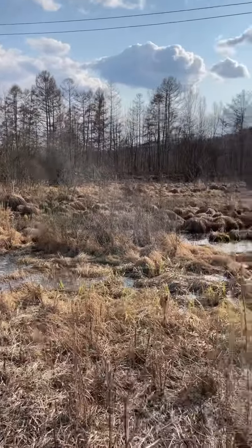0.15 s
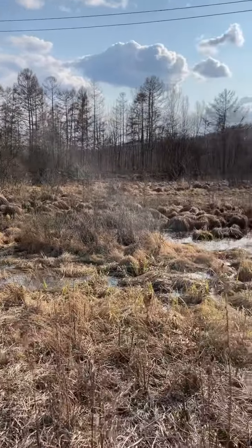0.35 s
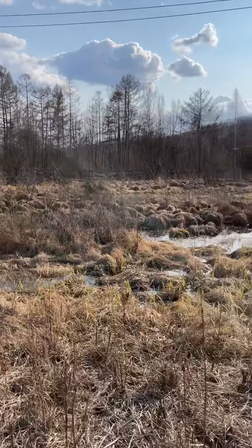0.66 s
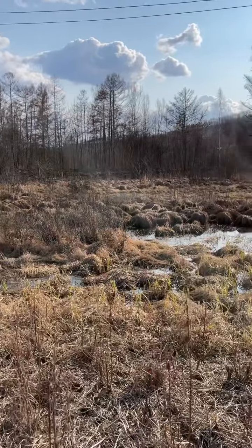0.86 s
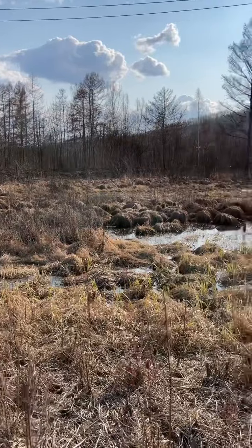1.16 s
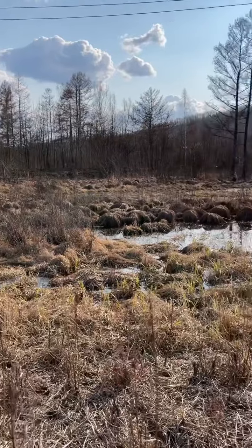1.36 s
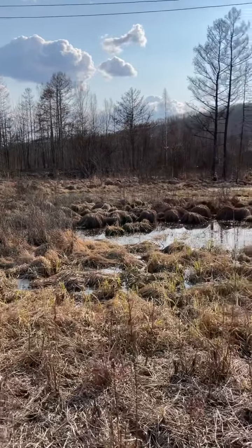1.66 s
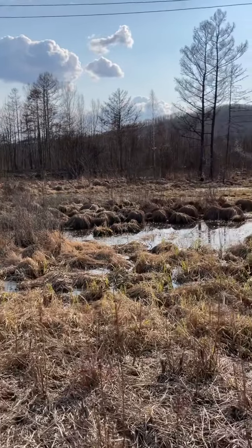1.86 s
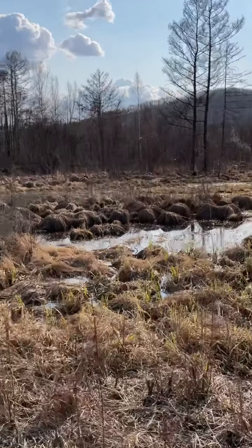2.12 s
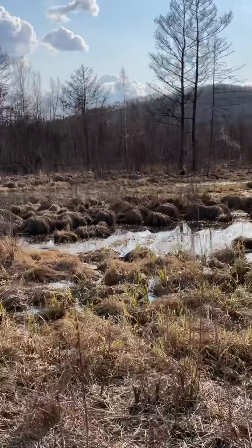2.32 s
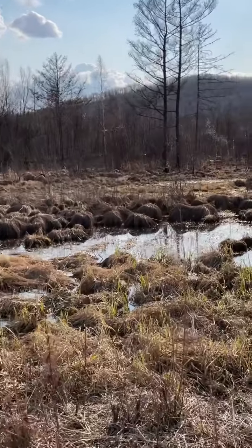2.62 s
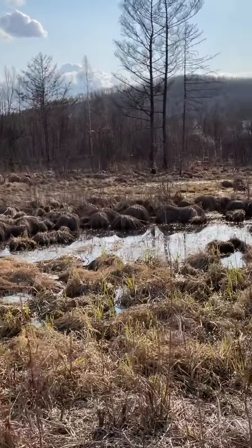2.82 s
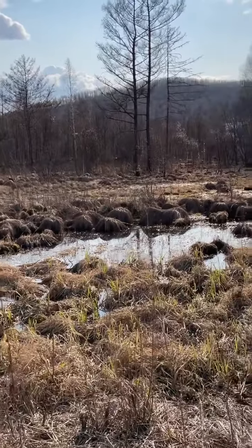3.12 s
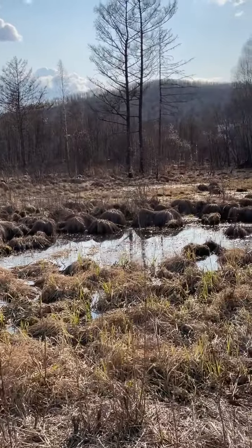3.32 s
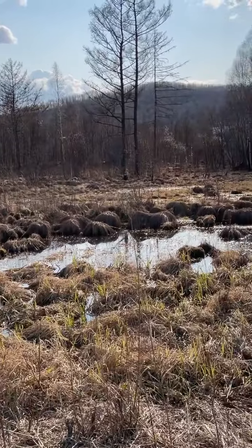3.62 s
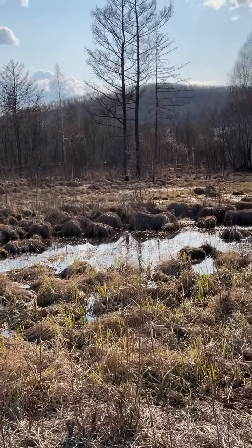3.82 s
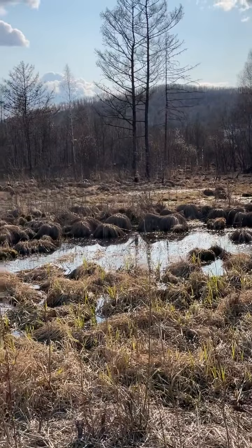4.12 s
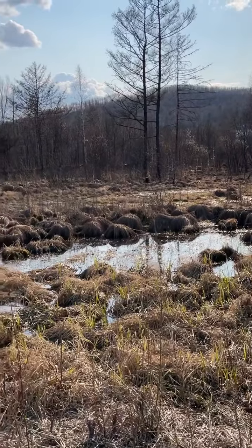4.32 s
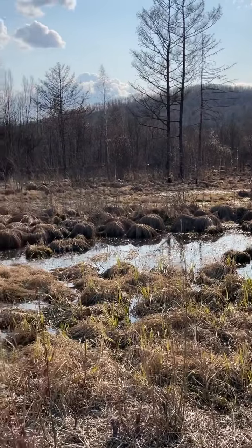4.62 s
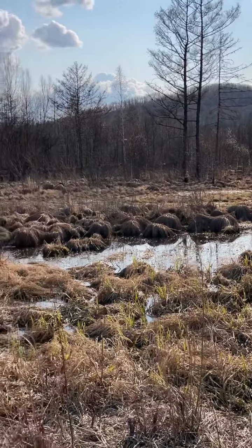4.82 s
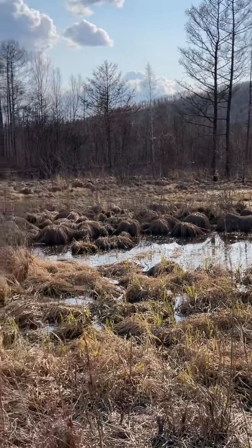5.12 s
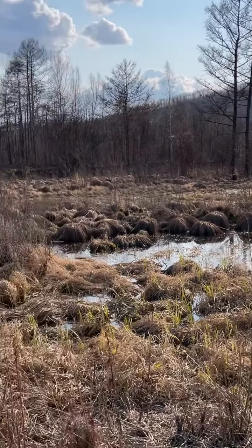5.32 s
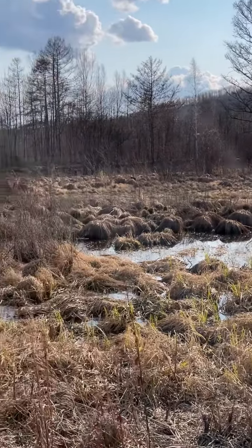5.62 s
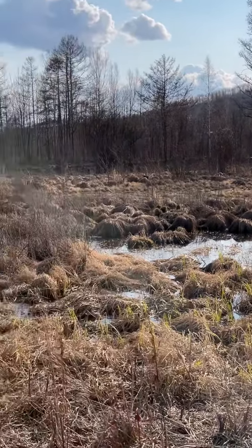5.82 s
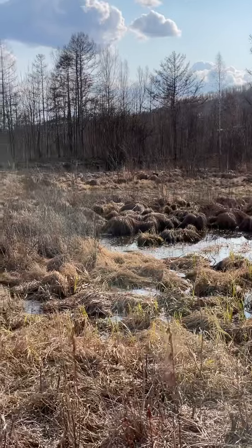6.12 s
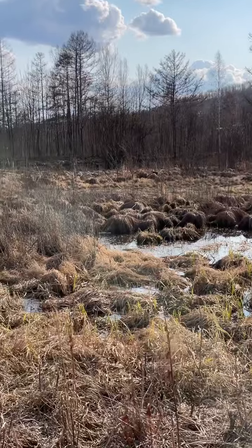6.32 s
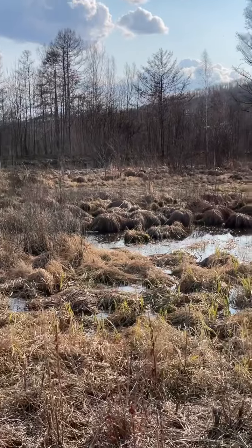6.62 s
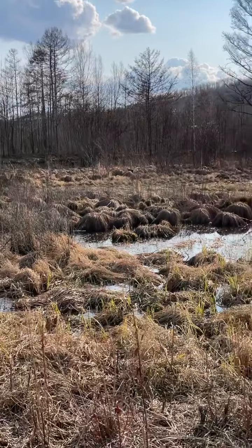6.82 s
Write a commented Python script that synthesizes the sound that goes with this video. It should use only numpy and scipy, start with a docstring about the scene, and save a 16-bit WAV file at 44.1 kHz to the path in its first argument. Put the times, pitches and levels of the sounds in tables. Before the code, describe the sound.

A dense chorus of frogs trills in short, rising notes over a marsh pool, while low wind bumps and slaps grow stronger later on.

```python
"""A marsh pool full of frogs, each trilling short, clear, arched notes; most calls climb in pitch.
From the start near calls stand out of a farther crowd over a swelling hiss, like a blur of far frogs,
with a thin rustle, sharp ticks, and wind that bumps and slaps.
From about 2 s the chorus drifts from the left toward the centre; most of the wind slaps come after 3.6 s.
Frogs are sums of gliding sine partials; hiss, rustle, ticks and wind are shaped noise, slaps falling tones."""
import sys
import numpy as np
from scipy import signal
from scipy.fft import rfft, irfft, next_fast_len
from scipy.io import wavfile
from scipy.ndimage import uniform_filter1d, map_coordinates

SR = 44100
rng = np.random.default_rng(int(sys.argv[2]) if len(sys.argv) > 2 else 0)


def dump(signal):
    """Clip the signal to [-1, 1] and save it as 16-bit WAV at the path in sys.argv[1]."""
    limited = np.clip(np.atleast_2d(signal).T, -1, 1)
    pcm = np.round(limited * 32767).astype(np.int16)
    wavfile.write(sys.argv[1], SR, pcm)


N = 306936

# how the crowd and the hiss come and go:
# (time [s], far frogs' level [dB], hiss level [dB], lift of the far frogs' overtones [dB])
CROWD_LEVELS = [(0.0, -32, -42.5, -5.5), (.18, -39, -48, -4), (0.31, -33, -41, 0),
                (0.66, -29.5, -49.5, 4.5), (1.3, -33.5, -45.5, 1.5), (1.76, -30.5, -39.5, 1.5),
                (2.38, -31, -41, -5), (2.55, -42, -53, 6), (2.87, -37, -44, -7), (3.4, -34, -43.5, 4.5),
                (3.7, -42, -48.5, -6), (3.97, -31.5, -43.5, -3), (4.48, -34.5, -47.5, -4.5),
                (5.31, -36, -52, -4.5), (5.5, -29, -41, 2), (5.8, -29.5, -47.5, 3),
                (5.95, -42.5, -53.5, -8.5), (6.16, -39.5, -51, -0.5), (6.32, -38.5, -49.5, -0.5),
                (6.7, -38.5, -44.5, 1), (6.96, -35.5, -38.5, -2.5)]


def amp(db):
    """Decibels to an amplitude factor."""
    return 10 ** (np.asarray(db) / 20)


def unit(x):
    """Scale to an rms of 1."""
    return x / np.sqrt(np.mean(x ** 2) + 1e-20)


def along(points, hz):
    """Read (frequency [Hz], value) points on a logarithmic frequency axis."""
    f, v = np.transpose(points)
    return np.interp(np.log(hz + 1), np.log(f + 1), v)


def curves(rows):
    """Join the points of each column after the time: one value per sample."""
    s, *cols = np.transpose(rows)
    return [np.interp(np.arange(N) / SR, s, c) for c in cols]


def wobble(rate):
    """A smooth random curve with rate knots a second."""
    knots = rng.standard_normal(int(N * rate / SR) + 4)
    return map_coordinates(knots, [np.arange(N) * rate / SR])


def filtered(x, response):
    """Multiply the spectrum of x by a response that depends on frequency."""
    m = next_fast_len(N + SR // 2)
    hz = np.fft.rfftfreq(m, 1 / SR)
    return irfft(rfft(x, m) * response(hz), m)[..., :N]


def noise(spectrum, channels=1):
    """Random noise coloured by a spectrum, rms 1."""
    white = rng.standard_normal((channels, N))
    return unit(filtered(white, lambda hz: amp(along(spectrum, hz))))


def frogs():
    """Near notes over the far crowd; distance over the reeds dulls the top."""
    crowd = amp(curves(CROWD_LEVELS)[0]) * unit(trills(count=66))
    voices = notes(skirt=1.2) + warbles() + crowd
    voices = filtered(voices, lambda hz: 1 / np.sqrt(1 + (hz / 4250) ** 12)) + rings()
    tail = marsh(voices, t60=0.2)
    return voices + amp(-14) * tail


def notes(skirt):
    """The pitch glides and sags at both ends; the strong octave swells briefly, other partials last longer."""
    vary_length, vary_glide, vary_pitch, vary_db = .2, 0.04904, 0.0093, 1.5  # note-to-note scatter
    glide, skew = -0.01954, .4  # shared slope as a share of pitch; deeper sags fall further at the end
    rise, fall = .8, 1.2  # a note starts faster than it dies away
    half = SR // 20
    out, t = np.zeros((2, N + SR)), np.arange(-half, half) / SR
    for s, length, sag, hz, db, bright_db in sung():
        longer, steeper, higher, louder = np.tanh(rng.standard_normal(4))
        # u is 0 at the middle of the note and reaches the skirt where it falls silent
        this_length = length * (1 + vary_length * longer)
        u = np.clip(t / np.where(t < 0, rise, fall) / this_length, -skirt, skirt)
        arch_db = 20 * np.log10(np.abs(np.cos(np.pi / 2 * u / skirt)) + 1e-6)
        fade_db = arch_db * np.array([[3], [5], [1.6]])
        swell_db = db + vary_db * louder + np.array([[-4.5], [0], [bright_db]]) + fade_db
        slope = glide - skew * sag + vary_glide * steeper
        pitch = hz * (1 + vary_pitch * higher) * (1 + slope * u - sag * u ** 2)
        add(out, s, pitch, swell_db, rough=.005, unsteady=0.7)
    return out[:, half:half + N]


def sung():
    """List every near note: in a call, pitch and strength move evenly from first to last note."""
    # near calls, each a train of notes: (first note [s], last note [s], notes [count],
    # middle note early by [s], note length scale [s], sag at both ends [share of pitch],
    # first pitch [Hz], last pitch [Hz], first level [dB], last level [dB], overtone lift [dB])
    near_calls = [(0.018, 0.291, 5, -0.00073, .03, 0.13, 611, 689.7, -26, -39.5, 6),
                  (0.41, 0.654, 5, 0.009, 0.037, 0.098, 586.5, 667, -25.5, -19.5, 1),
                  (0.493, 0.666, 4, 0.003, .035, 0.099, 679.5, 689.6, -24.5, -21.5, -5),
                  (0.497, 0.817, 6, -0.00063, 0.042, .16, 743, 768, -28, -24, -8.5),
                  (0.918, 1.112, 4, 0.0047, .026, .16, 814, 824, -46, -38, -6),
                  (0.986, 1.207, 5, 0.013, .028, 0.18, 634.6, 752, -24.5, -21, 0.5),
                  (1.478, 1.769, 6, 0.0065, 0.026, .14, 633.6, 668, -27.5, -19, -33),
                  (1.556, 1.796, 5, 0.011, 0.024, 0.16, 688, 780, -38, -15, -6),
                  (1.938, 2.098, 3, -0.0019, .028, 0.13, 719, 752, -31.5, -25, -3),
                  (1.971, 2.115, 3, 0.0095, 0.026, .12, 629, 633, -22.5, -19.5, -10.5),
                  (2.151, 2.311, 4, -0.0076, 0.037, .16, 635, 681, -29.5, -19.5, -6),
                  (2.397, 2.499, 3, 0.0083, 0.032, 0.14, 632, 686, -31, -26, -1.5),
                  (2.916, 3.044, 3, 0.023, 0.023, .14, 719, 756, -33, -46.5, 3),
                  (3.06, 3.524, 9, 0.0098, 0.032, .12, 578.8, 681.5, -27, -34, -15),
                  (3.697, 4.126, 8, 0.0052, 0.03316, 0.144, 603, 725, -29.5, -22.5, -4),
                  (4.319, 5.023, 11, 0.014, 0.028, 0.35, 673, 855.6, -28.5, -21, -5),
                  (4.502, 4.973, 8, 0, 0.029, 0.21, 562, 554, -32.5, -43.5, 4.5),
                  (4.729, 5.129, 6, -0.0069, .033, .1, 641, 637.6, -48, -25, -12.5),
                  (5.177, 5.908, 14, 0.0094, .03, .12, 600.4, 741.4, -32, -16, -3),
                  (5.584, 5.934, 7, -0.012, .027, .16, 642, 657.4, -21.5, -19.5, -1),
                  (6.293, 6.89, 12, 0.0039, 0.039, 0.086, 636.6, 750.8, -25.5, -25.5, -2),
                  (6.831, 6.964, 3, 0.00046, 0.043, 0.059, 665, 659, -23.5, -21, -5)]
    # single notes outside the regular trains, faint to loud:
    # (middle [s], pitch [Hz], level [dB], overtone lift [dB])
    single_notes = [(0.065, 731, -30, 4), (0.159, 640, -28, -12), (0.23, 675, -24, -11),
                    (0.544, 800, -25, 0), (0.77, 665, -27, -7), (0.894, 675, -26.5, 3),
                    (0.932, 648, -23, -1), (1.052, 665, -23, -9), (1.322, 604, -32, 8),
                    (1.379, 640, -20.5, -2), (1.845, 599, -31.5, -8.5), (2.09, 595, -28, -12.5),
                    (2.448, 645, -32.5, 8), (2.682, 790, -43, -5), (2.77, 711, -30.5, 0),
                    (2.796, 660, -29, -13), (2.876, 636, -30, -3), (3.305, 650, -28.5, 3),
                    (3.44, 761, -33.5, 1), (3.49, 791, -32.5, 6), (3.8, 639, -32, 3), (4.1, 653, -25, 1.5),
                    (4.157, 647, -23, -29), (4.244, 801, -39.5, 13), (4.287, 651, -27, -16.5),
                    (4.437, 614, -24.5, -9), (5.054, 650, -26.5, 0), (5.289, 620, -25.5, -6.5),
                    (5.389, 660, -25, 6), (5.499, 620, -28, 2.5), (5.558, 619, -19.5, -2),
                    (5.666, 665, -22.5, -6), (6.081, 550, -34, -7), (6.151, 840, -30, -5),
                    (6.157, 625, -26, -15), (6.186, 794, -20, 0), (6.215, 638, -25.5, 0),
                    (6.254, 635, -24.5, -12), (6.317, 640, -21.5, -2), (6.401, 654, -17, -7),
                    (6.424, 661, -23, -15), (6.461, 692, -16.5, -3), (6.731, 732, -24.5, -5)]
    single_length, single_sag = 0.02605, .14  # length scale [s], sag [share of pitch]
    rows = [(s, single_length, single_sag, *rest) for s, *rest in single_notes]
    for first, last, count, early, length, sag, hz0, hz1, db0, db1, bright_db in near_calls:
        for u in np.linspace(0, 1, round(count)):
            s = first + (last - first) * u - 4 * early * u * (1 - u)
            hz = hz0 + (hz1 - hz0) * u
            db = db0 + (db1 - db0) * u
            rows.append((s, length, sag, hz, db, bright_db))
    return rows


def add(out, s, pitch, swell_db, rough, unsteady=0.94, early=0, dull_db=0, mouth_hz=3000, mouth_db=0):
    """Add one frog from time s: flickering partials on a shaky pitch, set between the microphones."""
    # partials of the voice, scatter and flicker before the caller's unsteadiness: (multiple of the pitch,
    # level [dB], scatter [dB], flicker [dB], scatter of the left side's lead [rad])
    partials = [(1, -12, 7, 5.5, 1), (2, -1.5, -2, 1.5, 0.17), (3, -25, 3.5, 7.5, 0.11),
                (4, -34.5, 8, 10, .4), (5, -34.5, 5, 11, 0.49), (6, -35, 5.5, 13.5, 0.49),
                (7, -42, 3, 11.5, 0.57), (8, -49, -2, 7.5, .5)]
    # extra level of the fundamentals: (time [s], level [dB])
    low_levels = [(0, -1), (1, -3), (2, -5), (3, -1), (4.2, 3.5), (5, 4), (5.7, 2.5), (6.96, -4.5)]
    mouth_width_hz = 410
    order, level_db, scatter_db, flicker_db, lead_scatter = np.transpose(partials)[..., None]
    count = len(partials)
    group = np.minimum(np.arange(count), 2)  # fundamental, octave, overtones
    t = np.arange(len(pitch)) / SR
    knots = np.arange(int(t[-1] * 300) + 2) / 300
    shake = np.interp(t, knots, rng.standard_normal(len(knots)))
    turns = np.cumsum(pitch * (1 + rough * shake)) / SR
    # per partial: level, lead and starting phase, then the flicker at 75 knots a second
    draw = np.tanh(rng.standard_normal((count, 3 + len(knots[::4]) + 1)))
    flicker = np.array([np.interp(t, np.arange(len(d)) / 75, d) for d in draw[:, 3:]])
    start, heard_s = max(round(s * SR), 0), s - early
    gain_db = swell_db[group] + level_db - dull_db * np.maximum(order - 3, 0)
    gain_db = gain_db + unsteady * (scatter_db * draw[:, :1] + flicker_db * flicker)
    gain_db = gain_db + mouth_db * np.exp(-((order * pitch - mouth_hz) / mouth_width_hz) ** 2)
    gain_db = gain_db + (order == 1) * np.interp(heard_s, *np.transpose(low_levels))
    tilt_db, lead = place(heard_s)[group].T[..., None]
    # a random phase shake roughens the overtones
    phase_shake = np.array([np.interp(t, knots, k) for k in rng.standard_normal((count, len(knots)))])
    phase = 2 * np.pi * (order * turns + draw[:, 2:3]) + unsteady * .35 * (order > 2) * phase_shake
    for side, half in enumerate((.5, -.5)):
        wave = np.sin(phase + half * (lead + lead_scatter * draw[:, 1:2]))
        out[side, start:start + len(t)] += np.sum(amp(gain_db + half * tilt_db) * wave, 0)


def place(s):
    """Left-right level and phase differences of fundamental, octave and overtones at time s."""
    # where the chorus sits: (time [s], position [0 left to 1 near the centre])
    drift_points = [(0, 0.25), (.7, 0.0063), (2.2, 0), (2.8, 0.47), (3.9, 0.65), (4.6, 1), (6.96, 0.93)]
    # both ends of the drift, rows fundamental, octave, overtones: (left minus right [dB], left lead [rad])
    at_left = [(11, 0.5), (7.3, 0.69), (1.4, 0.97)]
    at_centre = [(1.8, 2.32), (4.34, 0.34), (.3, 0.54)]
    drift = np.interp(s, *np.transpose(drift_points))
    return (1 - drift) * np.array(at_left) + drift * np.array(at_centre)


def warbles():
    """Calls whose notes run together into one wavering line, higher and louder at every throb."""
    # unbroken calls: (start [s], end [s], throbs [per s], first throb after [s], first pitch [Hz],
    # last pitch [Hz], waver [share of pitch], fundamental [dB], octave [dB], overtones [dB],
    # loss per partial above the third [dB], mouth resonance [Hz], its lift [dB])
    wavering_calls = [(2.532, 2.673, 16.5, .002, 708, 657, 0.025, -25, -23, -25.5, 0.5, 3080, 16.5),
                      (5.084, 5.375, 18, 0.017, 670, 930, 0.12, -31, -43, -26.5, 10.5, 3100, 21.5),
                      (5.982, 6.148, 18, .026, 515, 644, 0.081, -49, -64, -11.5, 19, 1900, -2.5),
                      (3.185, 3.33, 16, 0.017, 595, 560, 0.02, -31, -27, -38, 0, 3000, 5),
                      (6.64, 6.765, 17, 0.031, 700, 735, 0.0088, -28.5, -20.5, -31, -2, 4200, 8.5),
                      (6.24, 6.33, 17.6, .03, 580, 635, 0.014, -35, -27.5, -29, 2, 2500, 6)]
    # swing of the throb either way, for fundamental, octave, overtones: (level [dB])
    throb_db = [
        [2.5],
        [2.5],
        [1.5],
    ]
    edge_s = .012
    out = np.zeros((2, N + SR))
    for start, end, rate, first, hz0, hz1, waver, *levels_db, dull_db, mouth_hz, mouth_db in wavering_calls:
        t = np.arange(round((end - start) * SR)) / SR
        throb = np.cos(2 * np.pi * rate * (t - first))
        ends_db = 20 * np.log10(np.minimum(1, np.minimum(t, t[::-1]) / edge_s) + 1e-6)
        swell_db = np.array(levels_db)[:, None] + np.array(throb_db) * (throb - 1) + ends_db
        pitch = np.linspace(hz0, hz1, len(t)) * (1 + waver * throb)
        add(out, start, pitch, swell_db, rough=0.0013, unsteady=0.4,
            dull_db=dull_db, mouth_hz=mouth_hz, mouth_db=mouth_db)
    return out[:, :N]


def rings():
    """Single overtones that ring out: a slightly shaky arched tone under a smooth swell."""
    # (middle [s], length scale [s], first pitch [Hz], last pitch [Hz], arch height [Hz], level [dB])
    ringing_tones = [(2.454, 0.073, 3990, 3750, 64, -49), (2.505, 0.043, 3450, 3310, 26, -52),
                     (2.529, 0.018, 3750, 3700, 24, -46.5), (3.269, 0.035, 2950, 2730, 62, -48),
                     (3.415, 0.057, 4660, 3970, 56, -51.5), (3.48, 0.033, 4070, 3840, 101, -48.5),
                     (3.521, 0.047, 3430, 3370, 88.5, -53.5), (4.07, 0.055, 3670, 3760, 66, -49),
                     (4.314, 0.035, 4000, 3880, 192, -53.5), (4.513, .03, 3670, 3770, 62, -54),
                     (4.587, 0.026, 3500, 3520, 78, -46), (4.708, 0.019, 3900, 3970, 52, -51.5),
                     (4.74, 0.024, 5700, 5530, 67, -66), (4.788, .04, 3330, 3250, 56, -54),
                     (4.825, 0.023, 3400, 3710, 54, -51), (4.794, 0.05, 2250, 1960, 298, -46.5),
                     (4.882, .05, 2350, 1940, 298, -50), (4.957, 0.046, 2310, 1920, 300, -46.5),
                     (5.017, .045, 2300, 2130, 280, -46), (4.878, 0.028, 4930, 4540, 152, -55),
                     (4.958, 0.036, 4700, 4480, 251, -63), (5.675, 0.038, 2600, 2210, 278.5, -33.5),
                     (5.136, 0.06, 3190, 3090, -75, -60), (5.201, .03, 3030, 2860, 48, -50),
                     (5.271, 0.033, 2920, 2920, 43, -48), (5.34, 0.052, 3200, 3020, 59, -51.5),
                     (5.72, 0.061, 4300, 4520, 75, -56), (5.811, 0.045, 2750, 2570, 76, -43),
                     (5.874, 0.018, 2590, 2400, 24, -33), (5.896, 0.041, 3750, 3660, 22.5, -38.5),
                     (5.502, 0.054, 3800, 3760, 104, -53.5), (6.277, 0.023, 3320, 3180, 40, -53),
                     (6.32, .025, 3030, 3015, 145.5, -46.5), (6.38, 0.013, 2890, 2890, 150.5, -40),
                     (6.439, 0.022, 3600, 4330, 77, -50), (6.501, .035, 2710, 2650, 57, -53),
                     (6.52, 0.028, 3220, 3000, 38, -61), (6.568, 0.037, 4260, 4250, 351, -62),
                     (6.62, .03, 3400, 3430, 59, -53), (6.695, .025, 4000, 3900, 42, -51.5),
                     (6.883, 0.02, 3780, 3760, 28, -50), (6.558, 0.036, 3400, 3410, 79, -61),
                     (6.623, 0.054, 4240, 4120, 99, -55), (6.663, 0.01, 4630, 4430, 77, -46.5),
                     (6.76, 0.028, 4020, 4000, 149, -46), (6.816, 0.025, 3800, 4240, 98, -42.5)]
    out = np.zeros((2, N + SR))
    for s, length, hz0, hz1, arch_hz, db in ringing_tones:
        u = np.linspace(-1, 1, round(length * 1.2 * SR))
        shake = np.interp(u, np.linspace(-1, 1, 12), rng.standard_normal(12))
        pitch = hz0 + (hz1 - hz0) * (u + 1) / 2 + arch_hz * (1 - u ** 2)
        phase = 2 * np.pi * np.cumsum(pitch) / SR + 0.76 * shake
        swell = np.cos(np.pi / 2 * u) ** 1.3
        tilt_db, lead = place(s)[2]
        start = round(s * SR) - len(u) // 2
        for side, half in enumerate((.5, -.5)):
            tone = amp(db + half * tilt_db) * swell * np.sin(phase + half * lead)
            out[side, start:][:len(u)] += tone
    return out[:, :N]


def trills(count, seconds=0.91):
    """Far callers: the voice runs on, rising in pitch and strength at every throb and over the whole call."""
    out = np.zeros((2, N + 3 * SR))  # one second of lead-in is cut off at the end
    t = np.arange(seconds * SR) / SR
    edges = np.minimum(t / 0.05, (seconds - t) / 0.056)
    ends_db = 20 * np.log10(np.minimum(1, edges) + 1e-6)
    bright_db = np.pad(curves(CROWD_LEVELS)[2], (SR, 2 * SR), "edge")
    for i, (pace, pitch, size, turn) in enumerate(np.tanh(rng.standard_normal((count, 4)))):
        s = (N / SR + 1) * i / count
        cycle = 2 * np.pi * (16 * (1 + .22 * pace) * t + turn + 0.301 * np.sin(7 * t + 5 * size))
        throb = np.cos(cycle)
        climb = 1 + .19 * t / seconds
        waver = 1 + 0.047 * throb - 0.029 * np.sin(cycle)
        hz = 558 * (1 + .095 * pitch) * climb * waver
        swell_db = np.array([[10.5], [10.5], [6]]) * (throb - 1)
        swell_db = swell_db + 1.1 * size + 5 * t / seconds + ends_db + [[1.5], [0], [0]]
        swell_db = swell_db + [[0], [0], [1]] * bright_db[round(s * SR):][:len(t)]
        add(out, s, hz, swell_db, rough=0.0047, early=0.94)
    return out[:, SR:N + SR]


def marsh(x, t60):
    """Reeds and water scatter the calls into a short tail, different at each microphone."""
    t = np.arange(int(t60 * SR)) / SR
    tail = rng.standard_normal((2, len(t))) * amp(-60 * t / t60)
    return signal.fftconvolve(x, tail / np.linalg.norm(tail[0]), axes=1)[:, :N]


def hiss_rustle_and_ticks():
    """Shaped noise: a swelling hiss under the chorus, a thin high rustle, and a few fast-fading ticks."""
    # colour of the hiss, which sounds like a blur of far frogs: (frequency [Hz], level [dB per Hz])
    hiss_spectrum = [(350, -18.5), (550, 5), (880, 0), (1300, 1.5), (1900, -5.5), (2600, -17), (3800, -20),
                     (5300, -31.5), (7000, -52.5), (9000, -120)]
    # strength of the rustle: (time [s], level [dB])
    rustle_levels = [(0.0, -75), (0.15, -77), (.9, -78.5), (1.3, -70), (1.9, -67), (2.5, -73.5),
                     (3.3, -74.5), (3.7, -77.5), (4, -73.5), (4.4, -76.5), (5, -77.5), (5.85, -73.5),
                     (6.05, -77.5), (6.5, -79), (6.96, -68.5)]
    # colour of the rustle: (frequency [Hz], level [dB per Hz])
    rustle_spectrum = [(3000, -23), (5000, 2.5), (6900, -8), (8200, -16), (9200, -59), (14000, -63.5),
                       (15500, -45)]
    # ticks, before their filter: (time [s], level [dB])
    tick_list = [(0.493, -49), (1.303, -46.5), (1.4457, -38), (2.145, -55), (2.4123, -46), (3.33, -49),
                 (3.823, -49), (3.865, -47.5), (5.8547, -49.5)]
    hiss_db = curves(CROWD_LEVELS)[1] + np.tanh(wobble(20))
    hiss = amp(hiss_db) * spread(hiss_spectrum, patchy_db=2)
    rustle_db = curves(rustle_levels)[0] + 2.4 * wobble(17)
    rustle = amp(rustle_db) * spread(rustle_spectrum, patchy_db=4.5)
    ticks, t = np.zeros(N + SR), np.arange(SR // 100) / SR
    for s, db in tick_list:
        ticks[round(s * SR):][:len(t)] += amp(db - 60 * t / 0.0047) * rng.standard_normal(len(t))
    tick_colour = lambda hz: np.clip(hz / 5000, 0, 1) ** 2 / (1 + (hz / 9000) ** 8)
    return hiss + rustle + filtered(ticks[:N], tick_colour)


def spread(spectrum, patchy_db):
    """Stereo noise, patchy in time and pitch and partly shared by both microphones."""
    # how much the two sides share: (frequency [Hz], left-right likeness [0 to 1])
    likeness = [(500, 0.72), (1800, 0.93), (4000, 0.54), (8000, 0.69)]
    turn = lambda hz: np.arccos(np.clip(along(likeness, hz), -1, 1)) / 2
    z = signal.stft(noise(spectrum, channels=2), nperseg=512)[2]
    field = uniform_filter1d(rng.standard_normal(z.shape[1:]), size=5, axis=0)
    field = uniform_filter1d(field, size=6, axis=1)
    patchy = signal.istft(z * amp(patchy_db * unit(field)), nperseg=512)[1]
    pair = unit(patchy[:, :N])
    mid, side = filtered(pair, lambda hz: np.array([np.cos(turn(hz)), np.sin(turn(hz))]))
    return np.array([mid + side, mid - side])


def wind():
    """Lumpy noise buffets the microphones, mostly alike at both, plus sharper slaps that fall in pitch."""
    # strength of the buffeting: (time [s], low level [dB], upper level above the low one [dB])
    buffet_levels = [(0.0, -31, -6), (0.06, -21.5, -23), (0.11, -22.5, -23.5), (0.17, -46, -5),
                     (0.23, -28.5, -22), (0.52, -45, -2.5), (0.91, -51.5, 0), (1.4, -48, 2.5),
                     (1.76, -39.5, -10), (1.86, -50.5, 4), (2.13, -38.5, -12), (2.29, -51.5, -0.5),
                     (2.42, -32, -5.5), (2.46, -43.5, -4), (3.78, -44, -8), (3.86, -50, -2),
                     (3.89, -32, -12), (4.11, -31, -27), (4.13, -42.5, -10), (4.46, -39, -15),
                     (4.52, -25, -12.5), (4.57, -45.5, -9), (4.65, -28.5, -18.5), (4.71, -47, -6),
                     (4.77, -32.5, -12.5), (4.81, -37, -10), (5.39, -33, -7.5), (5.43, -28, -3),
                     (5.46, -43, -7), (5.85, -34, -1), (5.87, -43, 0), (5.99, -26, -3.5),
                     (6.14, -31.5, -6.5), (6.25, -40, -3), (6.37, -39.5, -4), (6.43, -33.5, -1),
                     (6.5, -39, -4), (6.6, -37.5, 2), (6.65, -37, -7), (6.72, -29, 0), (6.8, -34, -7),
                     (6.96, -40.5, -2)]
    # colour of the low and of the upper buffeting: (frequency [Hz], level [dB per Hz])
    rumble_spectrum = [(15, -41), (25, -15.5), (33, -9), (46, 4.5), (71, 7.5), (120, 0), (200, -18),
                       (400, -75), (900, -120)]
    flutter_spectrum = [(60, -33), (130, 2.5), (180, 0.5), (270, -2), (380, -8.5), (520, -8), (750, -44),
                        (1500, -120)]
    # gust slaps: (time [s], level before its rise and fade [dB], nominal pitch [Hz]; it settles at 0.7 of that)
    slap_list = [(0.04, -22, 68.6), (0.086, -19.5, 79), (0.169, -24, 70.2), (0.206, -34, 79),
                 (0.262, -28, 62.4), (2.352, -27, 68.4), (2.669, -20.5, 126), (2.769, -23.5, 74),
                 (3.601, -31.5, 51), (3.684, -18.5, 86.6), (3.859, -11, 164), (3.916, -20, 70.5),
                 (4.016, -20, 110), (4.376, -35, 124), (4.494, -21.5, 88), (4.625, -23.5, 152),
                 (4.73, -21, 126), (4.824, -29.5, 89), (4.941, -21.5, 110.5), (5.016, -18, 116),
                 (5.064, -18.5, 182), (5.099, -20, 100), (5.151, -31, 74), (5.28, -17, 86),
                 (5.339, -18, 165), (5.371, -14, 191), (5.404, -24, 62.6), (5.528, -17.5, 159),
                 (5.556, -17.5, 132), (5.647, -13, 213), (5.716, -19, 59), (5.775, -17, 150),
                 (5.829, -11.5, 97), (5.923, -18.5, 79.5), (5.981, -15, 70), (6.036, -8.5, 142.5),
                 (6.089, -13, 111), (6.112, -9.5, 169), (6.156, -16.5, 135), (6.401, -15.5, 127),
                 (6.538, -14.5, 139), (6.433, -16.5, 150), (6.613, -17.5, 192), (6.676, -8.5, 163),
                 (6.709, -8.5, 207), (6.839, -33, 53.7)]
    low_db, upper_db = curves(buffet_levels)
    low = amp(low_db) * unit(amp(2.0 * wobble(13)) * noise(rumble_spectrum, channels=2))
    flutter = unit(amp(4.06 * wobble(35)) * noise(flutter_spectrum, channels=2))
    upper = amp(low_db + upper_db) * flutter
    # the difference between the sides is weaker than the shared part
    mid, side = low * amp([[0], [-21]]) + upper * amp([[0], [-5]])
    slaps, t = np.zeros(N + SR), np.arange(SR // 10) / SR
    for s, db, hz in slap_list:
        turns = .7 * hz * t + 1.6 * (1 - np.exp(-t / 0.0043))
        envelope = (1 - np.exp(-t / 0.0035)) ** 2 * np.exp(-t * hz / 1.21)
        slaps[round(s * SR):][:len(t)] += amp(db) * np.sin(2 * np.pi * turns) * envelope
    return slaps[:N] + np.array([mid + side, mid - side])


def scene():
    """Frogs, hiss, rustle and ticks, thinned between fundamental and octave (most near 6 s), plus wind."""
    # depth of the thinning: (time [s], share lost [0 to 1])
    gap_shares = [(0, 0.16), (2.4, 0.29), (3.9, 0.14), (4.4, 0.24), (5.3, 0.46), (6, 0.68), (6.5, 0.57),
                  (6.96, 0.37)]
    gap_hz, gap_width_hz = 840, 68
    chorus = frogs() + hiss_rustle_and_ticks()
    gap = filtered(chorus, lambda hz: np.exp(-((hz - gap_hz) / gap_width_hz) ** 4))
    return chorus - np.clip(curves(gap_shares)[0], 0, 1) * gap + wind()


def record(dry):
    """Add faint opposite-phase microphone noise, vary the bass width, then cut off the top."""
    # colour of the microphone noise: (frequency [Hz], level [dB per Hz])
    port_spectrum = [(4000, -12.5), (7000, -2), (11000, -5), (13500, -10), (15500, -5)]
    # bass difference between the sides, above 0 is wider: (time [s], level [dB])
    bass_width = [(0, -0.5), (.7, -1.5), (2.2, -3.5), (2.6, -18), (2.85, 7.5), (4.55, 14), (4.7, -49.5),
                  (6.96, -60)]
    top_hz = 15720
    mid, side = (dry[0] + dry[1]) / 2, (dry[0] - dry[1]) / 2
    side = side + amp(-74.5 + 2.5 * wobble(10)) * noise(port_spectrum)[0]
    bass = filtered(side, lambda hz: 1 / (1 + (hz / 330) ** 16))
    side = side - bass * (1 - amp(curves(bass_width)[0]))
    return filtered(np.array([mid + side, mid - side]), lambda hz: hz < top_hz)


dry = scene()
out = record(dry)
dump(out)
```